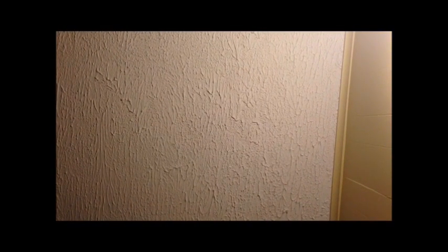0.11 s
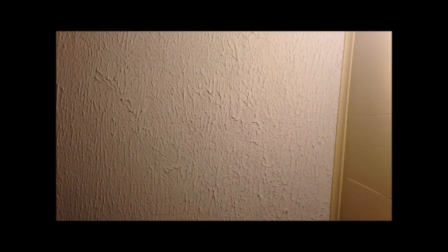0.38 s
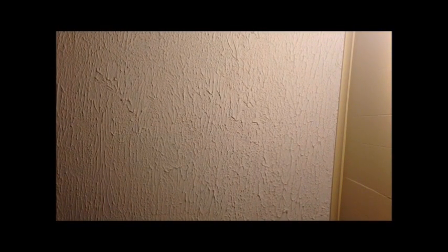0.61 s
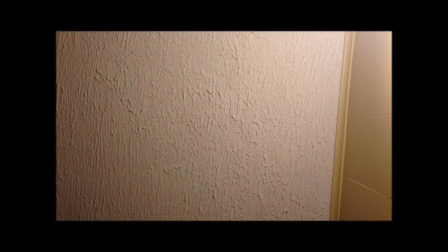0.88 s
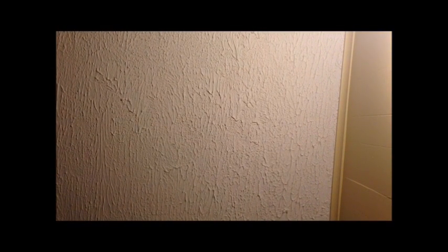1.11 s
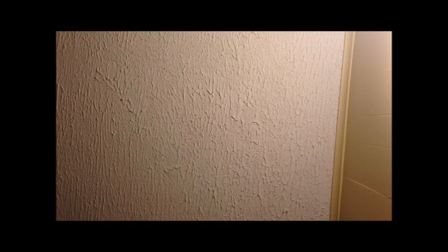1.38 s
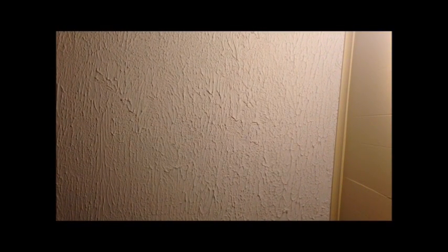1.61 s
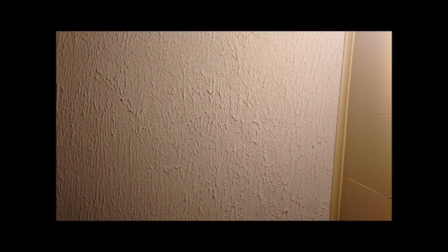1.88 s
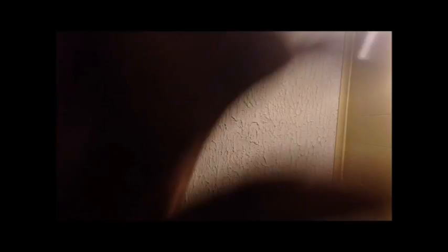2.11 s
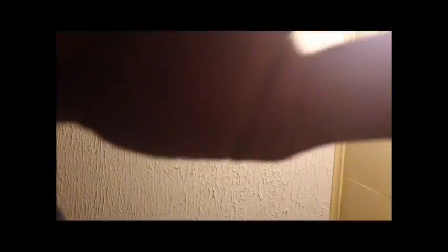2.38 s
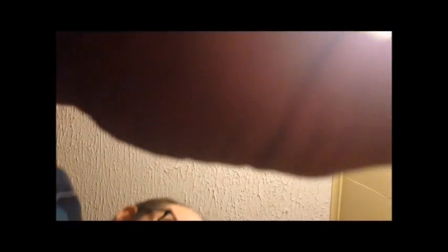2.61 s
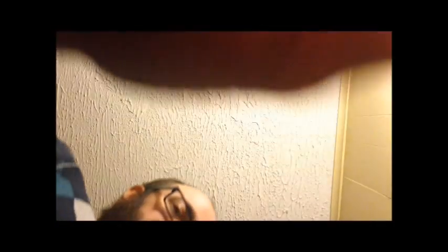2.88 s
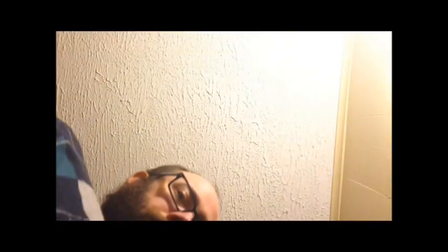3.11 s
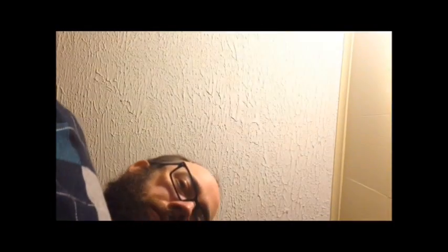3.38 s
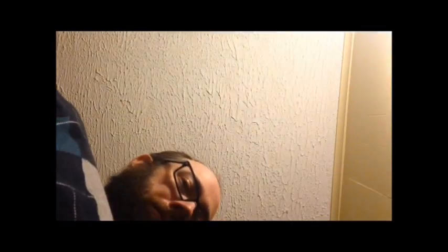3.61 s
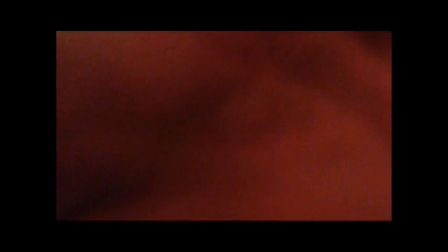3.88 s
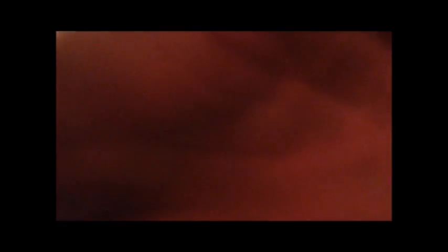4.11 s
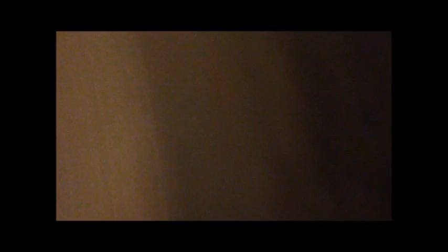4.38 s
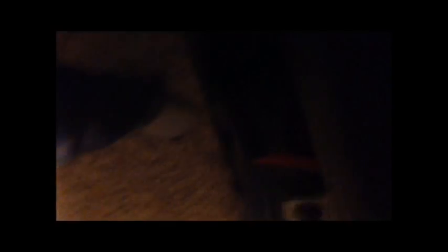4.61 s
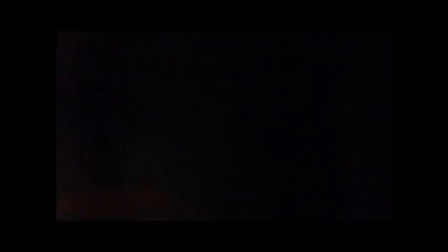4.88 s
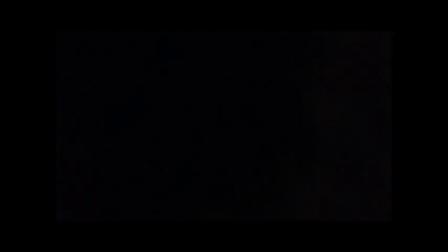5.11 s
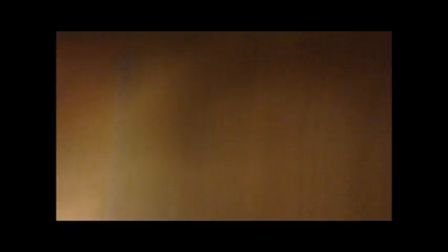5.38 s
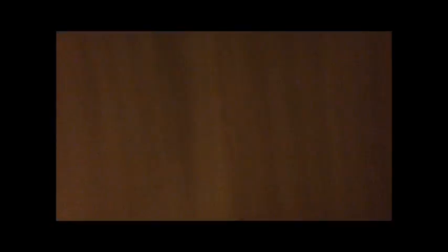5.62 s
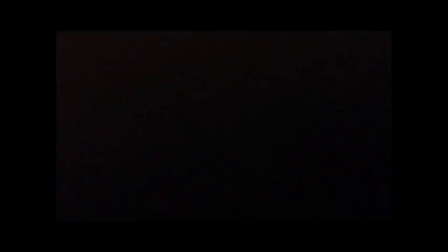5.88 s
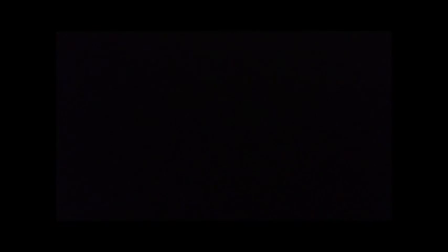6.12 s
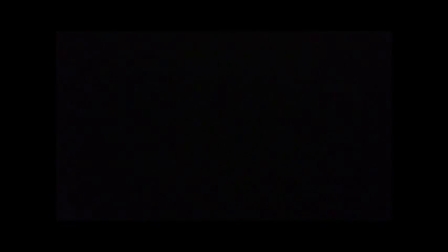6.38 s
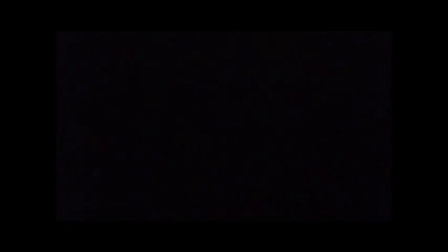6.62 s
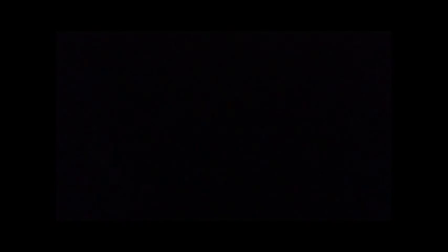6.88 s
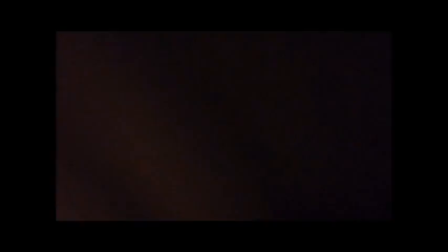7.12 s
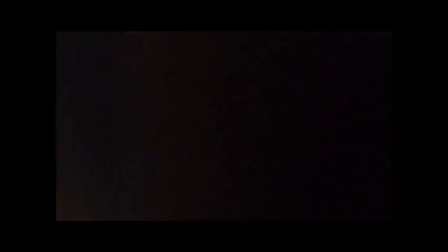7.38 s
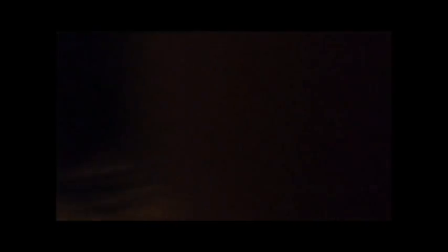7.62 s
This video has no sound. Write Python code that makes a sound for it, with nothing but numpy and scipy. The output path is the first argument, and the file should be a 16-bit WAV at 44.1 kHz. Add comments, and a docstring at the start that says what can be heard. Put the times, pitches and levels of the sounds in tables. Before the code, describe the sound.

Faint low hum and hiss with soft knocks, broken by violent close handling: dull thuds, sharp treble clicks and skin rubbing on a plastic shell.

```python
"""A small camera lies in a quiet room: hum lines, hiss and faint cloth run under a few dying knocks.
From about 3 s a hand grips, lifts and turns it: the shell snaps in short treble cycles, thumps in
low cycles that ring its modes, and hisses as skin drags; handling is densest from 4.4 to 5.9 s,
then thins, and returns after 7.2 s. Gain control ducks the whole mix after loud blows."""
import sys
import numpy as np
from scipy import signal
from scipy.fft import rfft, irfft, next_fast_len
from scipy.io import wavfile
from scipy.ndimage import uniform_filter1d, map_coordinates

SR = 44100
rng = np.random.default_rng(int(sys.argv[2]) if len(sys.argv) > 2 else 0)


def convert_level_to_amplitude(level_db):
    """Map a level in decibels to its linear amplitude factor."""
    exponent = np.asarray(level_db, float) / 20
    return 10 ** exponent


def log_audio(samples):
    """Write samples as a 16-bit WAV file to the path given in sys.argv[1]."""
    # one column per channel
    frames = np.atleast_2d(samples).T
    # limit to full scale, then quantise
    limited = np.clip(frames, -1, 1)
    pcm = np.round(limited * 32767).astype(np.int16)
    wavfile.write(sys.argv[1], SR, pcm)


N = 341775

# skin sliding on the shell: peak t/s, hiss level/dB, 60 dB rise/ms, t60/ms, drag over hiss/dB
RUBS = [(2.91, -63, 60, 200, 3), (2.945, -62.5, 100, 80, 0), (4.055, -65.5, 73, 140, 9),
        (4.1, -62, 240, 120, 1), (4.207, -60, 210, 320, 3.5), (4.307, -48.5, 100, 135, 3),
        (4.384, -52, 100, 54, 0.5), (4.428, -47, 110, 220, 3.5), (4.508, -43, 37, 150, 7),
        (4.572, -39, 120, 150, 1), (4.6, -42, 100, 100, -4), (4.65, -46, 100, 130, 4),
        (4.621, -21.5, 30, 55, 3.5), (4.695, -35, 60, 110, -2.5), (4.727, -46.5, 100, 48, 5.5),
        (4.86, -69.5, 52, 204, -4), (5.028, -43, 50, 146, 5.5), (5.06, -47, 50, 150, 5.5),
        (5.095, -25, 35, 13, 4), (5.124, -36.5, 29, 20, 10), (5.49, -53.5, 40, 200, 9),
        (5.521, -20.5, 52, 28, -3.5), (5.544, -54, 100, 400, 15.5), (5.612, -48, 150, 137, 3.5),
        (5.855, -23, 45, 107, -1.5), (5.93, -66.5, 150, 530, 13), (6.059, -43.5, 216, 244, 1.5),
        (6.25, -57, 128, 170, 3), (6.4, -87, 900, 2300, 17), (6.93, -82.5, 1600, 1100, 15),
        (7.217, -39.5, 178, 180, 2.5), (7.245, -45, 100, 95, 10), (7.295, -40.5, 240, 80, -22),
        (7.42, -53, 510, 500, -7), (7.5, -45, 110, 530, -41), (7.7, -54.5, 45, 200, -22),
        (7.749, -41, 200, 100, -32)]


def evened(x):
    """Scales to rms 1."""
    return x / np.sqrt(np.mean(x ** 2) + 1e-20)


def add(mix, start_s, sound):
    """Mixes a sound in from start_s; the end of the mix cuts it."""
    part = mix[round(start_s * SR):][:len(sound)]
    part += sound[:len(part)]


def coloured(x, points):
    """Shapes x by a spectrum of (f/Hz, level/dB) points, straight in log frequency, to rms 1."""
    size = next_fast_len(len(x))
    f_hz, level_db = np.transpose(points)
    bin_hz = np.fft.rfftfreq(size, 1 / SR)
    gain = convert_level_to_amplitude(np.interp(np.log(bin_hz + 1), np.log(f_hz + 1), level_db))
    return evened(irfft(rfft(x, size) * gain, size)[:len(x)])


def resonate(x, f_hz, width_hz):
    """One-pole complex resonance of about unit gain at its centre."""
    pole = np.exp((2j * np.pi * f_hz - np.pi * width_hz) / SR)
    return 2 * signal.lfilter([1 - abs(pole)], [1, -pole], x).real


def wander(rate_hz):
    """Slow random curve of rms 1: cubic spline through rate_hz random knots a second."""
    knots = rng.standard_normal(int(N * rate_hz / SR) + 4)
    return evened(map_coordinates(knots, [np.arange(N) * rate_hz / SR], order=3))


def grains(per_s, spread_db, smooth):
    """Sparse slips of uneven size over a smooth hiss."""
    size = convert_level_to_amplitude(spread_db * np.minimum(rng.exponential(1, N), 4))
    size = size * (rng.random(N) < per_s / SR)
    return evened(size * rng.standard_normal(N)) + smooth * rng.standard_normal(N)


def swells(rows):
    """Gain of power-summed swells (t/s, level/dB, rise/ms, t60/ms), straight in dB either side of the peak."""
    t = np.arange(0, N + 32, 32) / SR
    power = 1e-14
    for peak_s, db, rise_ms, t60_ms in rows:
        before = (peak_s - t) / max(rise_ms, 5)
        after = (t - peak_s) / max(t60_ms, 5)
        power = power + convert_level_to_amplitude(db - 60000 * np.maximum(before, after)) ** 2
    return np.interp(np.arange(N) / SR, t, np.sqrt(power))


def blows():
    """A crack at first contact, then a push of a few cycles or a longer ring, sharpest at its crest."""
    # blows and pushes on the shell, and a few longer low rings of it: crest t/s, level/dB,
    # settled f/Hz, t60/ms (4 or more), hardness as crack over push/dB
    blow_rows = [(4.055, -32, 800, 22, -14), (4.0634, -17, 660, 3.2, -18), (4.2023, -33, 966, 44, -1),
                 (4.2302, -34.5, 914, 5.4, -16), (4.336, -35.5, 640, 21, -13), (4.377, -26, 700, 17, -17),
                 (4.3846, -23, 240, 4.1, -29), (4.424, -18.5, 730, 36, 7), (4.432, -17, 197.3, 16, -31),
                 (4.466, -26.5, 610, 28, -23), (4.5034, -6, 396, 3.7, -11), (4.516, -18, 226, 150, -42),
                 (4.5638, 3.5, 496, 5.3, -17.5), (4.578, -2, 387.6, 4.3, -11.5),
                 (4.594, -9.5, 290, 21, -19), (4.6129, -1, 337, 3.5, -20), (4.6389, -9.5, 421.5, 8.4, -5.5),
                 (4.681, 1.5, 286, 2.5, -16), (4.696, -12.5, 305, 6.9, -23), (4.732, -32, 249.5, 280, -43),
                 (4.833, -36.5, 575.4, 11, 2), (5.0261, 2, 494, 18.7, -24.5),
                 (5.054, -2.5, 536.3, 31, -6.5), (5.0939, -9.5, 490, 11.4, -30),
                 (5.3965, -24.5, 661, 15, -23), (5.5047, 3.5, 459.5, 11.4, -10),
                 (5.5192, 1.5, 417, 5.2, -11), (5.53, -6, 269.6, 113, -42), (5.6158, -26, 264, 10, -20),
                 (5.7742, -24.5, 139.8, 8.6, -28), (5.839, -16, 100.2, 30, -30.5),
                 (5.848, -10, 60.17, 120, -21), (5.867, 3, 66.36, 35, -25.5), (6.0123, -33, 102, 60, -28),
                 (6.0588, -34, 510, 16, -25), (6.1027, -47, 495, 11, -17), (6.1736, -39.5, 153, 51, -5.5),
                 (6.1961, -24, 532.3, 4.1, -13.5), (6.5676, -19, 229, 7.3, -51.5),
                 (6.6691, -19, 198, 5.9, -45.5), (7.2206, -17.5, 143, 15, -21.5),
                 (7.3, -27.5, 225, 16, -15), (7.3726, -28, 109.6, 47, -13.5),
                 (7.4141, -21.5, 872, 13, -15.5), (7.4159, -37.5, 1670, 59, -20),
                 (7.4167, -13.5, 185, 107, -27), (7.4364, -17.5, 163.7, 67, -21.5),
                 (7.513, -20.5, 273, 8.4, -32), (7.5241, -20.5, 278, 46, -33), (7.545, -18, 154, 17, -39),
                 (7.5614, -16.5, 286, 6.5, -39), (7.575, -11.5, 365, 11, -37), (7.584, -19, 70, 75, -56),
                 (7.5993, -15, 290, 10, -46), (7.623, -24, 130, 15, -52), (7.6567, -20.5, 167, 48, -46),
                 (7.687, -21.5, 88, 72, -32.5), (7.7223, -11, 290, 11, -51), (7.7467, -13.5, 343, 17, -30)]
    rise_cycles, soft_cycles_per_db = 0.5, 0.012  # a softer contact builds slower
    rounding_per_db = 0.004  # share of the rise over which the crest is rounded, per dB of softness
    out = np.zeros(N)
    since = np.arange(500) / SR
    crack_shape = np.exp(-since / 0.0026) * (1 - np.exp(-since / 0.0001))
    for (crest_s, db, f_hz, t60_ms, hard_db), phase in zip(blow_rows, rng.random(len(blow_rows))):
        rise_s = (rise_cycles - soft_cycles_per_db * hard_db) / f_hz
        t60_s = max(t60_ms, 4) / 1000
        t = np.arange(-1.6 * rise_s, 1.5 * t60_s, 1 / SR)
        shape = np.where(t < 0, np.cos(np.pi / 2 * t / t[0]) ** 2, convert_level_to_amplitude(-60 * t / t60_s))
        rounding = 25 + int(rounding_per_db * -min(hard_db, 0) * rise_s * SR)
        shape = uniform_filter1d(shape, size=rounding)
        turns = f_hz * (t + 0.00018 * np.tanh(t / 0.0027)) + phase
        octave_gain = convert_level_to_amplitude(-6.5 + 0.22 * hard_db) * np.exp(-abs(t) / 0.0055)
        push = np.sin(2 * np.pi * turns) + octave_gain * np.sin(4 * np.pi * turns)
        add(out, crest_s + t[0], convert_level_to_amplitude(db) * shape * push)
        crack = resonate(rng.standard_normal(500), 1100, 1700)
        crack = evened(resonate(crack, 1200, 2400))
        add(out, crest_s - rise_s, convert_level_to_amplitude(db + hard_db) * crack * crack_shape)
    return out


def shell(x):
    """Modes of the plastic shell ring on after what drives them; a steep low-pass keeps them dull."""
    # shell modes: f/Hz, level/dB, time to fall 95 dB/s
    modes = [(70, -17.5, .1), (130, -7.5, 0.03), (240, -4, 0.067), (290, -3, 0.074), (425, -2, 0.21),
             (483, -8.5, 0.035), (800, -21.5, 0.0096), (1020, -28, 0.031)]
    rings = 0
    for k, (f_hz, db, t95_s) in enumerate(modes):
        rings = rings + (-1) ** k * convert_level_to_amplitude(db) * resonate(x, f_hz, 3.5 / t95_s)
    return signal.sosfilt(signal.butter(3, 1300, fs=SR, output="sos"), rings)


def small_snaps():
    """Random snaps shed by sliding skin; size follows the hiss, so firm slides crackle."""
    per_s, low_hz, high_hz = 70, 3000, 7500
    firm_db = -40  # hiss level at which a snap exceeds the hiss by over_db or more
    over_db, spread_db, growth_db_per_db = 1.5, 4.5, 1.5
    when, size, tone = rng.random((int(per_s * N / SR), 3)).T
    snap_s = 0.01 + when * (N / SR - 0.02)
    hiss_gain = swells(np.array(RUBS)[:, :4])
    hiss_db = 20 * np.log10(hiss_gain[(snap_s * SR).astype(int)])
    db = firm_db + growth_db_per_db * (hiss_db - firm_db) + over_db - spread_db * np.log(1 - size)
    return list(zip(snap_s, db, low_hz + tone * (high_hz - low_hz)))


def ticks():
    """A slip is a cycle or two of treble with a fizz of smaller slips behind it."""
    # clearest snaps of the shell under the fingers: t/s, level/dB, centre f/Hz
    tick_rows = [(2.93, -46, 4440), (2.955, -45.5, 2500), (4.0425, -45, 6000), (4.05, -43, 4000),
                 (4.0617, -24, 3630), (4.2023, -50, 2400), (4.2072, -33.5, 3660), (4.3762, -26.5, 4000),
                 (4.3863, -11.5, 6900), (4.3898, -17.5, 6750), (4.4222, -30.5, 4200), (4.4251, -5, 6030),
                 (4.4328, -27.5, 4680), (4.4391, -19, 6200), (4.4643, -18.5, 3980), (4.4871, -40, 2700),
                 (4.5029, -7.5, 6600), (4.5061, -4, 7900), (4.5125, -16, 4300), (4.5227, -29.5, 3660),
                 (4.5523, -4.5, 2870), (4.5638, 4.5, 3510), (4.5756, -1.5, 5330), (4.586, -26, 7280),
                 (4.5946, -11.5, 6800), (4.6115, -15.5, 4130), (4.6152, -3.5, 2750), (4.6184, -3.5, 5460),
                 (4.6235, 1, 8260), (4.6281, -8, 7400), (4.6383, -8.5, 4200), (4.6415, -7.5, 6800),
                 (4.6605, -23.5, 5010), (4.664, -6, 7890), (4.6799, 1, 6670), (4.6869, -4.5, 6200),
                 (4.6898, -4, 7500), (4.6952, -14, 7800), (4.699, -14.5, 9060), (4.7045, -16.5, 6210),
                 (4.7104, -5, 7230), (4.7156, -7.5, 8960), (4.7316, -27.5, 5970), (4.834, -39.5, 2510),
                 (4.8432, -40, 5240), (5.0246, -5, 4040), (5.0273, -3, 3840), (5.0315, -4, 7860),
                 (5.0401, -15.5, 9500), (5.0522, 1.5, 6200), (5.0557, 2, 6800), (5.0694, -9, 6760),
                 (5.073, -13.5, 7300), (5.084, -28.5, 4640), (5.0924, 1.5, 8300), (5.0956, -0.5, 7700),
                 (5.0988, -1.5, 7500), (5.1138, -29, 7010), (5.1223, -6, 7260), (5.1275, -13, 9600),
                 (5.1339, -19.5, 6870), (5.1605, -12, 6850), (5.482, -33.5, 4980), (5.4976, -34.5, 2780),
                 (5.5052, -4, 5650), (5.5168, -1.5, 4730), (5.5274, -7.5, 6620), (5.6045, -14.5, 6640),
                 (5.6072, -17.5, 7450), (5.752, -51, 2490), (5.767, -53, 2400), (5.838, -11.5, 7500),
                 (5.8476, -1.5, 7280), (5.8534, -18.5, 6800), (5.8642, -13.5, 3600), (5.8691, -11.5, 3700),
                 (6.0403, -24.5, 4950), (6.061, -32, 4420), (6.0773, -30, 2940), (6.105, -40, 3000),
                 (6.173, -43.5, 4900), (6.1962, -25.5, 6760), (7.2116, -16, 5260), (7.219, -8, 7560),
                 (7.2254, -5, 7200), (7.3705, -27, 3800)]
    rows = [*tick_rows, *small_snaps()]
    out = np.zeros(N)
    t = np.arange(-40, 900) / SR
    fizz_gain = (t > 0) * (convert_level_to_amplitude(-10.5) * np.exp(-t / 0.00079) + convert_level_to_amplitude(-39.5) * np.exp(-t / 0.01))
    for (snap_s, db, f_hz), phase in zip(rows, rng.random(len(rows))):
        snap = np.exp(-(t * f_hz / 0.55) ** 2) * np.cos(2 * np.pi * (f_hz * t + phase))
        noise = rng.standard_normal(len(t))
        noise = noise - 0.5 * uniform_filter1d(noise, size=15)  # less bass
        fizz = fizz_gain * evened(resonate(noise, f_hz, 4.8 * f_hz))
        add(out, snap_s + t[0], convert_level_to_amplitude(db) * (snap + fizz))
    return out


def grips():
    """Skin hisses and drags over the shell; jolts shake its modes and heave the whole body."""
    # spectra: f/Hz, level/dB
    skin_spectrum = [(900, -38), (2000, -13), (3500, -4), (5500, -5), (7000, -5), (9000, -7.5), (15000, -9)]
    drag_spectrum = [(300, -30), (700, 9.5), (1100, 5.5), (2000, 1.5), (3200, -10.5), (6000, -32)]
    heave_spectrum = [(15, -44), (35, -9.5), (60, 5.5), (110, 3), (180, -1.5), (400, -57)]
    # jolts of the hand: peak t/s, mode rattle level/dB, body heave level/dB, 60 dB rise/ms, t60/ms
    jolt_rows = [(4.064, -27.5, -38.5, 47, 38), (4.205, -43, -75, 28, 99), (4.4, -60, -47, 180, 160),
                 (4.44, -43, -29.5, 106, 33), (4.49, -40.5, -35, 120, 360), (4.581, -16, -15, 140, 230),
                 (4.689, -20, -20, 95, 165), (4.76, -41.5, -50, 320, 314), (5.02, -19.5, -33, 29, 183),
                 (5.06, -30, -28, 60, 155), (5.12, -30, -30, 100, 100), (5.273, -80.5, -54, 240, 130),
                 (5.36, -58, -68, 14.5, 130), (5.399, -31, -56.5, 19, 140), (5.503, -8, -29, 45, 222),
                 (5.772, -50.5, -51, 150, 94), (5.857, -15, -13.5, 63, 113), (5.6, -42, -37.5, 180, 340),
                 (6.051, -38, -49, 185, 250), (6.18, -50, -39.5, 200, 280), (6.285, -53.5, -55, 260, 390),
                 (6.567, -60.5, -40, 90, 230), (6.673, -51, -43.5, 120, 200), (7.232, -31, -27.5, 196, 185),
                 (7.42, -29, -27.5, 59, 153), (7.575, -35.5, -24, 300, 630), (7.723, -21, -17.5, 44, 71)]
    slips = grains(3000, 2.5, smooth=1.5)
    slips = slips * convert_level_to_amplitude(1.2 * wander(90))
    peak_s, hiss_db, rise_ms, t60_ms, drag_db = np.transpose(RUBS)
    hiss = swells(zip(peak_s, hiss_db, rise_ms, t60_ms)) * coloured(slips, skin_spectrum)
    drag = swells(zip(peak_s, hiss_db + drag_db, rise_ms, t60_ms)) * coloured(slips, drag_spectrum)
    peak_s, rattle_db, heave_db, rise_ms, t60_ms = np.transpose(jolt_rows)
    shaken = evened(shell(grains(400, 1.1, smooth=0.67)))
    rattle = swells(zip(peak_s, rattle_db, rise_ms, t60_ms)) * shaken
    rumble = coloured(rng.standard_normal(N), heave_spectrum)
    heave = swells(zip(peak_s, heave_db, rise_ms, t60_ms)) * rumble
    return hiss + drag + rattle + heave


def knocks():
    """Each knock arrives as a dense dying cloud of reflections with one ring standing out."""
    # knocks heard through the room: t/s, level/dB, ring f/Hz, ring over cloud/dB, t60/s (0.02 or more)
    knock_rows = [(0.472, -51, 1130, -8, 0.44), (0.498, -67.5, 385, 8, 1), (.556, -39, 4780, -0.5, 0.27),
                  (0.5562, -45, 6800, 17, 0.019), (0.665, -61.5, 2630, -5, 0.28),
                  (1.09, -70.5, 546, 3.5, 0.38), (1.245, -68, 563, 3, 0.52), (1.422, -56, 536, -4, 0.3),
                  (1.624, -65.5, 2360, 6, 1), (1.63, -53.5, 523, -0.5, 0.3), (1.7, -40, 192, 2, 0.3),
                  (2.345, -69, 181, 15, 0.34), (2.879, -49, 870, 12, 0.033), (2.884, -54, 82, 18, 0.17),
                  (2.964, -63.5, 96, 24.5, 0.2), (3.36, -52, 3060, 9.5, 0.019),
                  (3.362, -48.5, 646, 2, 0.12), (3.515, -52.5, 1070, 17, 0.11),
                  (6.239, -48, 1560, 1.5, 0.27)]
    out = np.zeros(N)
    t = np.arange(SR // 2) / SR
    peak_hz = np.geomspace(400, 16000, 60)
    for start_s, db, ring_hz, ring_db, t60_s in knock_rows:
        # a thing that rings higher also sounds brighter
        slope_db_per_octave = -4 + 1.46 * np.log2(ring_hz / 1000)
        noise = rng.standard_normal(len(t))
        # many small resonances of the room
        peaks_db = 2.5 * rng.standard_normal(len(peak_hz))
        level_db = slope_db_per_octave * np.log2(peak_hz / peak_hz[0]) + peaks_db
        level_db = level_db - 6 * (peak_hz / 10000) ** 2
        cloud = coloured(noise, [(60, -40), (250, -10), *zip(peak_hz, level_db)])
        treble = cloud - uniform_filter1d(cloud, size=7)
        cloud -= (1 - convert_level_to_amplitude(-60 * t)) * treble  # treble dies first
        ring = resonate(noise, ring_hz, 0.18 * ring_hz)
        ring = evened(resonate(ring, ring_hz, 0.5 * ring_hz))
        near = np.exp(-(t60_s / 0.39) ** 4)  # short tails come from near, with a sharp direct sound
        direct = 1 + 6.5 * near * np.exp(-t / 0.0005)
        onset = 1 - np.exp(-t / (0.00015 + 0.0027 * (1 - near)))
        fade = convert_level_to_amplitude(db - 60 * t / max(t60_s, 0.02))
        build = 1 - np.exp(-t * ring_hz / 0.5)  # the ring builds over a cycle or two
        ring_gain = convert_level_to_amplitude(ring_db - 0.035 * ring_hz * t) * build
        add(out, start_s, fade * (direct * onset * cloud + ring_gain * ring))
    return out


def room():
    """Wavering hum lines, air and electronic hiss, and a little cloth."""
    # mains hum carried through the resting surface: f/Hz, relative level/dB
    hum_lines = [(60, -65.5), (120, -63), (136, -77), (180, -83.5), (240, -77.5), (360, -82.5)]
    # hum coupling to the microphone and faint cloth movement: t/s, hum gain/dB, rustle level/dB
    room_levels = [(0, 1, -84), (.4, 1, -80.5), (1, 2, -82), (2.1, 2, -76.5), (2.4, 2, -72),
                   (2.75, 0.5, -74.5), (2.95, 4, -75), (3.2, -7.5, -79), (3.901, -4, -81.5),
                   (5, -11.5, -89), (6.601, -4, -78.5), (6.9, 1, -71.5), (7.1, -4, -74.5),
                   (7.75, -7.5, -73)]
    # spectra: f/Hz, level/dB
    air_spectrum = [(15, -38.5), (25, -18.5), (127, -6), (149, -9.5), (175, -6), (236, -16.5), (285, -17),
                    (363, -16), (863, -26), (2110, -29), (2690, -33.5), (14800, -43), (16000, -67.5)]
    cloth_spectrum = [(590, -37.5), (1000, -2), (1630, -16), (2130, -10.5), (14800, -14), (16000, -21)]
    point_s, hum_db, rustle_db = np.transpose(room_levels)
    t = np.arange(N) / SR
    hum = np.zeros(N)
    for f_hz, db in hum_lines:
        gain = np.sqrt(2) * convert_level_to_amplitude(db + 0.31 * wander(2.1))
        hum += gain * np.sin(2 * np.pi * f_hz * t + 0.15 * wander(2.2))
    air = convert_level_to_amplitude(-65.5 + 0.36 * wander(0.85)) * coloured(rng.standard_normal(N), air_spectrum)
    cloth = coloured(grains(1500, 2.6, smooth=2.6), cloth_spectrum)
    hum_gain = convert_level_to_amplitude(np.interp(t, point_s, hum_db))
    rustle_gain = convert_level_to_amplitude(np.interp(t, point_s, rustle_db))
    return hum_gain * hum + air + rustle_gain * cloth


def scene():
    """Handling through the shell, knocks and room through the air; blows also ring the shell."""
    hits = blows()
    handling = ticks() + hits + convert_level_to_amplitude(-15.5) * shell(hits) + grips()
    return (handling + knocks() + room())[None]


def roll_off(x):
    """The treble ends steeply here."""
    return signal.sosfilt(signal.butter(12, 16510, fs=SR, output="sos"), x)


def record(dry):
    """Gain control falls fast and recovers slowly; then soft overload and a steep band edge."""
    threshold_db, fall_db_per_s = -24.0, 54.0  # the held level falls at this rate
    cut_db_per_db = 0.19
    power_db = 10 * np.log10(abs(uniform_filter1d(dry[0] ** 2, size=600)) + 1e-12)
    fall_db = np.arange(N) * fall_db_per_s / SR
    held_db = np.maximum.accumulate(power_db + fall_db) - fall_db
    over_db = np.maximum(held_db - threshold_db, 0)
    cut = convert_level_to_amplitude(cut_db_per_db * uniform_filter1d(over_db, size=300))
    ducked = np.tanh(1.256 * dry / cut) / 1.097
    band = signal.oaconvolve(ducked, signal.firwin(255, 15300, fs=SR)[None], "same")
    mix = band + convert_level_to_amplitude(-29.5) * (ducked - band)  # a little passes above the edge
    return roll_off(mix)


dry = scene()
out = record(dry)
log_audio(out)
```